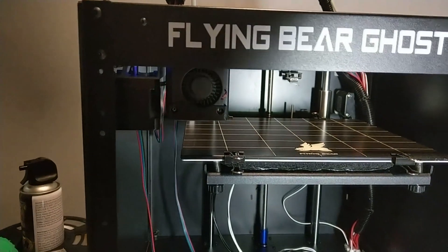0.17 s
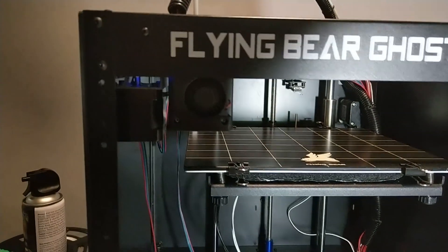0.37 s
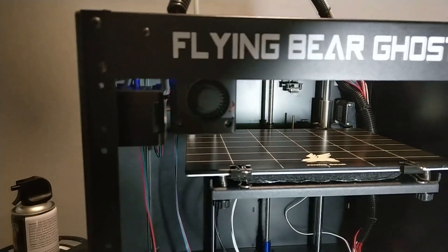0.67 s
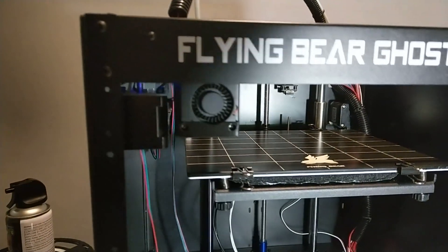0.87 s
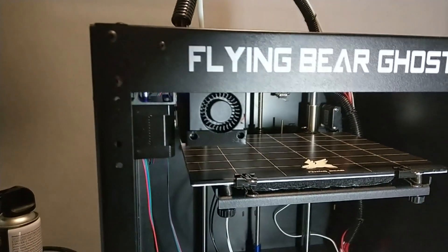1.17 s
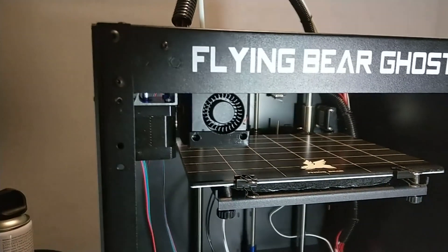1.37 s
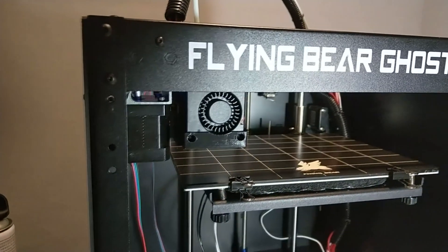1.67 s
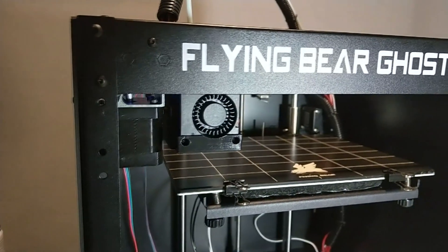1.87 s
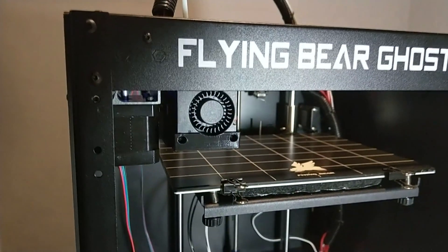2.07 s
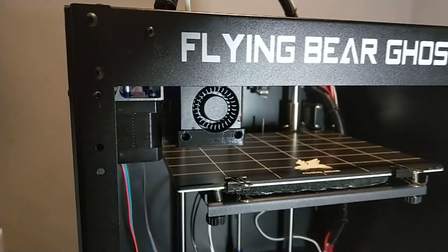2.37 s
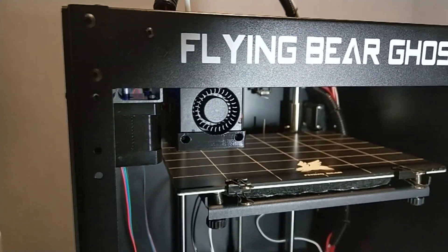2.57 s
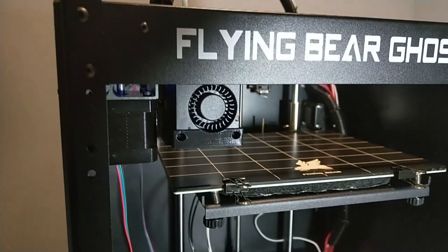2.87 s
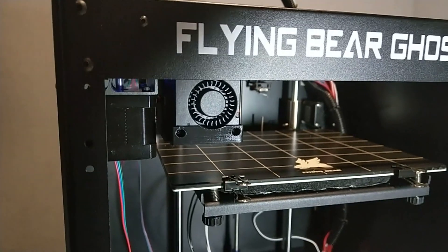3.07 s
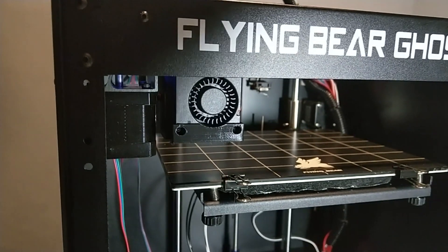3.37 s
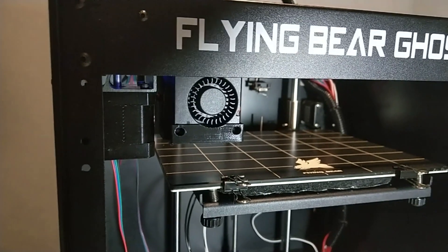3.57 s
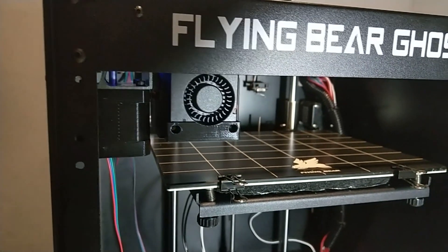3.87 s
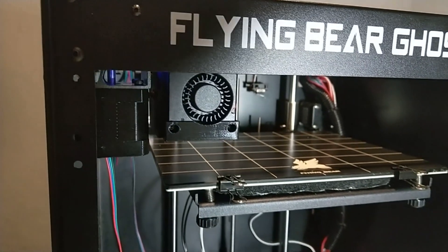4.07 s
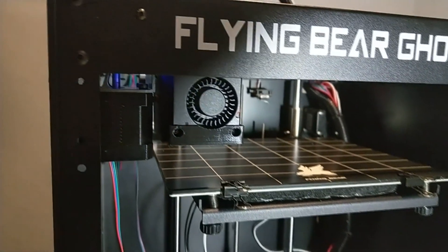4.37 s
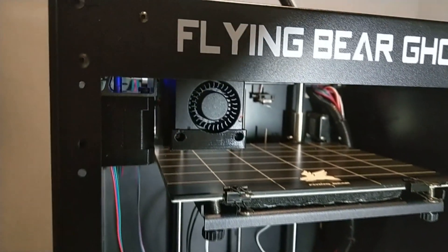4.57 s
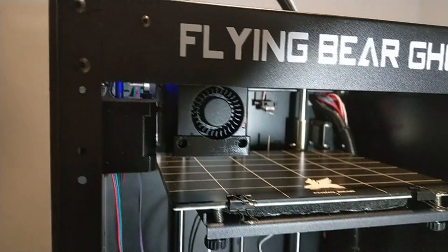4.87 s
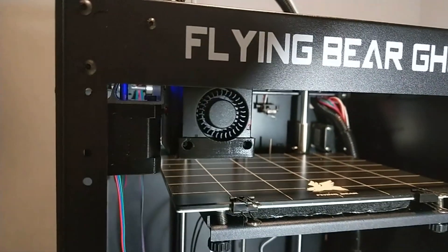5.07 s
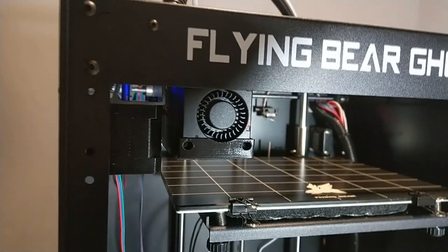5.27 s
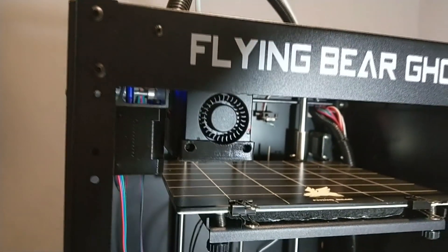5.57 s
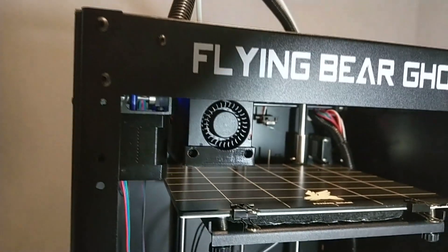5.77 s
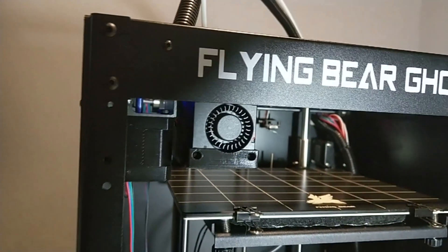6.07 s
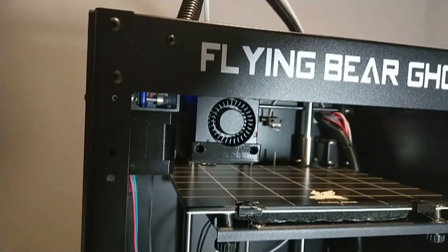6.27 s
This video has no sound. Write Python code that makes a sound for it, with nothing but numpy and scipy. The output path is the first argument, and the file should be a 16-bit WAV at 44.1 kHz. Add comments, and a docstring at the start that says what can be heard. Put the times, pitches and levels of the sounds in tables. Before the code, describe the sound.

A small cooling fan with a worn bearing runs in an open metal printer cabinet, close to a hand-held microphone. From the start it makes a shrill, buzzy whine with a metallic rattle, throbbing very quickly. At about 0.4 seconds the throb ends and the high whine carries on, wavering and roughening as the rubbing catches, slips and settles, with small scraping flutters around 0.7, 1.1 and 1.6 seconds. Near 2.4 seconds the rotor breaks free: the piercing whine stops and the fan speeds up slightly. A fine, steady rattle now rings the casing as a bright hiss over a quiet, gently rising hum, lasting until the end at about 6.4 seconds. A soft rush of air continues throughout. Faint low bumps and rubs from the hand come now and then, mostly between 3 and 4.3 seconds.

```python
"""A small blower with a worn bearing runs in an open metal cabinet, close to a hand-held phone.
At first the shaft knocks in step with each turn, making a whine that throbs as the rotor wobbles.
Air rushes throughout, and the hand bumps and rubs the phone. From 0.4 s the rubbing contact catches,
slips and settles. Near 2.4 s it breaks loose: the rotor speeds up, and its rattle rings the casing
as a hiss over a hum."""
import sys
import numpy as np
from scipy import signal
from scipy.fft import rfft, irfft
from scipy.io import wavfile
from scipy.ndimage import uniform_filter1d

SR = 44100
rng = np.random.default_rng(int(sys.argv[2]) if len(sys.argv) > 2 else 0)


def master(y):
    """Save y as 16-bit WAV."""
    cut = np.clip(np.atleast_2d(y).T, -1, 1)
    pcm = np.round(cut * 32767)  # scale
    wavfile.write(sys.argv[1], SR, pcm.astype(np.int16))


N = 282681
T = np.arange(N) / SR
F = np.maximum(np.fft.rfftfreq(N, 1 / SR), 1)

# How fast the shaft turns: (time [s], speed [turns per s])
SHAFT_SPEED = [(0, 157.65), (0.15, 156.66), (0.3, 157.42), (0.6, 158.05), (0.8, 158.43), (1.3, 158.86),
               (1.6, 158.96), (2, 158.8), (2.24, 158.7), (2.33, 158.6), (2.38, 157.7), (2.44, 160.2),
               (2.6, 164.5), (2.75, 166.79), (3, 169.18), (3.3, 171.03), (3.6, 170.93), (4.2, 174.02),
               (4.8, 175.2), (5.5, 175.75), (6.4, 176)]
# When the contact is caught, slipping, settled and finally free: (start [s], time to change over [s])
STAGE_CHANGES = [(.42, .04), (.6, .18), (1.04, .16), (2.372, .025)]
# The left microphone compared with the right:
# (frequency [Hz], level [dB], phase [rad], share reflected by the cabinet [0-1])
LEFT_MIC = [(59.3, 6, 0.5, 0.5), (196, -2, 0.42, 0.25), (544, -1.5, 0.23, 0.8), (880, -2.5, 1, 0),
            (1470, 0, 2, 0.7), (1970, -14, 1.5, 0.4), (2930, 0, 2, 0.61), (4410, -0.5, 2, 0.88),
            (5360, -9, 7.5, 1), (6860, -9.5, -1, 1), (7920, -20, 8.5, 1), (8610, -6, 7, 0),
            (9540, 9, 19.5, 0.14), (12200, -3.5, 0.5, 0.6)]


def undb(db):
    """Turn decibels into a gain."""
    return 10 ** (np.asarray(db) / 20)


def over_time(table):
    """Turn a time table into curves with one value per sample."""
    times, *columns = np.transpose(table)
    return [np.interp(T, times, column) for column in columns]


def over_hz(table):
    """Turn a frequency table into curves with one value per frequency in F."""
    hz, *columns = np.transpose(table)
    return [np.interp(np.log(F), np.log(hz), column) for column in columns]


def unit(x):
    """Scale a signal to an average (RMS) size of 1."""
    return x / np.sqrt(np.mean(x ** 2))


def wander(rate_hz, size=N):
    """A smooth random curve of average size 1 that heads somewhere new rate_hz times a second."""
    hold = int(SR / rate_hz)
    steps = np.repeat(rng.standard_normal(size // hold + 1), hold)
    return unit(uniform_filter1d(uniform_filter1d(steps, hold), hold)[:size])


def bump(middle_s, half_s):
    """A smooth rise and fall that reaches 1 in the middle."""
    return np.cos(np.pi / 2 * np.clip((T - middle_s) / half_s, -1, 1)) ** 2


def resonance(hz, width_hz, db):
    """A steep filter for something that rings near one pitch."""
    return undb(db) / (1 + 1j * (F / hz - hz / F) * hz / width_hz) ** 2


def sustained(spectrum, evenness=0.4):
    """A ringing that keeps itself going, as a complex signal with its dips partly filled in."""
    ringing = signal.hilbert(irfft(spectrum, N))
    return ringing * (np.std(ringing) / np.abs(ringing)) ** evenness


def contact_stages():
    """The share of each stage over time: throbbing, caught, slipping, settled, free."""
    changes = [np.clip((T - start) / takes, 0, 1) for start, takes in STAGE_CHANGES]
    reached = np.array([np.ones(N), *changes, np.zeros(N)])
    return reached[:-1] - reached[1:]


def knocking(turns, wobble, throb, low_throb, stages, loose):
    """Knocks on every turn blend into a whine of harmonics: tones at multiples of the shaft speed."""
    # The whine's tones; the wobble adds a side tone below and above each: (harmonic [number],
    # throbbing [dB], caught [dB], slipping [dB], settled [dB], lower side [dB], upper side [dB])
    harmonics = [(1, -59, -61, -63, -64, -15, -19), (2, -74, -87, -84, -85, -7, -7),
                 (3, -66, -66, -64, -64, -26, -23), (5, -78, -74, -70, -68, -16, -19),
                 (7, -77, -73, -73, -74, -14, -7), (9, -70, -68, -70, -74, -13, -14),
                 (11, -77, -70, -76, -69, -12, -10), (12, -65, -72, -71, -65, -2, -1),
                 (13, -57, -56, -60, -61, -11, -16), (14, -65, -68, -70, -66, -4, -1),
                 (15, -62, -62, -61, -65, -8, -7), (17, -69, -67, -70, -69, -13, -11),
                 (20, -63, -56, -60, -67, -15, -17), (21, -74, -71, -69, -72, -10, -10),
                 (24, -72, -70, -71, -66, -14, -18), (25, -66, -68, -74, -69, -7, -14),
                 (26, -71, -67, -69, -70, -9, -10), (27, -64, -58, -59, -61, -12, -4),
                 (28, -62, -59, -66, -65, -7, -12), (30, -77, -75, -74, -70, -6, -6),
                 (31, -62, -59, -62, -55, -6, -6), (32, -79, -65, -64, -65, -7, -4),
                 (33, -68, -54, -55.5, -57, 0, 0), (34, -75, -67, -63, -60, -7, -6),
                 (35, -62, -60, -53, -57, -4, -5), (36, -74, -68, -65, -57, -8, -10),
                 (37, -59, -59, -58, -48, -6, -9), (38, -72, -60, -62, -59, -5, -5),
                 (39, -73, -65, -54, -58, -10, -6), (40, -70, -68, -66, -65, -8, -3),
                 (41, -62, -48, -52, -52, -2, -2), (42, -58, -60, -55, -56, -7, -1),
                 (43, -57, -52, -48, -45, -8, 0), (44, -48.5, -51, -47, -53, -9, -5),
                 (45, -36, -35.5, -41, -39.5, 2, -3), (46, -61, -43, -48, -50, -4, -4),
                 (47, -57, -45, -55, -40.5, -5, -1), (48, -61, -54, -56, -66, -2, -4),
                 (49, -56, -43, -38, -43, -3, -3), (50, -52, -50, -52, -53, -3, -8),
                 (51, -65, -60, -52, -49, -2, -5), (52, -70, -58, -56, -62, -7, -5),
                 (53, -58, -82, -64, -62, -4, -7), (54, -70, -65, -64, -70, -5, -5),
                 (55, -70, -72, -62, -59, -5, -1), (89, -92, -85, -77, -77, 6, 3)]
    # How strongly the wobble rocks the tones: (time [s], side tone strength [factor])
    wobble_strength = [(.45, .4), (.58, .45), (.68, .9), (.82, .6), (.98, .5), (1.1, 1), (1.2, 1),
                       (1.25, .5), (1.31, .5), (1.37, 1.15), (1.85, 1), (1.97, .5), (2.23, .45),
                       (2.33, 1.1)]
    # Tones the left microphone hears in their own way, compared with the right: (harmonic [number],
    # level before settling [dB], level after [dB], phase before [rad], phase after [rad])
    left_tones = [(1, -1, 0, -0.4, -0.3), (3, -2, -3, 0.5, 0.5), (5, 1, -3, -0.5, -0.4),
                  (9, -2, 4, 2.3, 1.4), (13, -7, -7, 0.8, 0.6), (15, -15, -7, -3.0, -2.6),
                  (20, -13, -4, 2.8, 0.7), (24, 2, -7, 0.9, 2.5), (27, -4, -12, 1.6, 2.9),
                  (28, -3, -4, 3.0, 2.3), (31, 2, -10, -0.4, 3.1), (33, -2, -2, -1.2, -0.9),
                  (34, -6, -11, 0.9, 2.5), (35, -8, -6, -2.3, -1.8), (36, -6, -8, 1.4, 0.6),
                  (37, -4, -12, 2.4, 1.7), (39, -7, -7, -1.5, 0.6), (41, -10, -9, 3.0, 0.5),
                  (42, -5, -3, 0.3, -0.5), (43, -3, -11, 2.8, -1.2), (44, -15, -12, 2.7, -2.4),
                  (45, -13, -10, 2.0, -2.6), (46, -17, -13, 0.6, -2.8), (47, -13, -20, -2.8, -1.6),
                  (49, -22, -23, 2.2, 2.5), (50, -12, -8, -1.3, -0.6), (51, -11, -11, 2.7, 2.7)]
    left_by_order = {order: rest for order, *rest in left_tones}
    mic_hz, mic_db, mic_rad, _ = np.transpose(LEFT_MIC)
    first_high_order, waver_db = 42, 1.5
    n = int(sum(STAGE_CHANGES[-1]) * SR)  # the knocking ends once the rotor is free
    throbbing, caught, slipping, settled, free = stages[:, :n]
    settled = settled + free
    roughness = 0.045 + loose[:n]
    angle = 2 * np.pi * turns[:n] + 0.001 * wander(30, n)  # bearing play blurs the high tones most
    sway = (1 - throbbing) * over_time(wobble_strength)[0][:n]
    rock = np.exp(1j * (wobble[:n] + 0.5 * settled * wander(7.34, n)))
    slip_dip = 1.2 * caught * slipping  # up to 30 % quieter half-way from caught to slipping
    out = np.zeros((2, N))
    for order, *stage_db, below_db, above_db in harmonics:
        # Odd harmonics keep step, giving two knocks a turn.
        start_rad = 0.16 * order ** 2 if order % 2 else rng.uniform(0, 2 * np.pi)
        reach = min(order / 45, 1)  # dip, throb and flutter affect the high tones most
        gain = sum(share[:n] * undb(db) for share, db in zip(stages, stage_db))
        waver = 1 + (undb(waver_db) - 1) * (8 < order < first_high_order) * wander(4.88, n)
        pulse = (low_throb if order < first_high_order else throb)[:n] ** (min(3 * reach, 1) ** 2)
        gain = gain * (1 - reach * slip_dip) * waver * pulse
        flutter = roughness * reach ** 2 * (wander(53.56, n) + 1j * wander(54.9, n))
        below, above = undb(below_db), undb(above_db)
        shape = 1 + 1j * sway * (below / rock + above * rock) + flutter  # all rock in pitch together
        shape /= np.sqrt(1 + sway ** 2 * (below ** 2 + above ** 2))
        tone = np.sqrt(2) * gain * shape * np.exp(1j * (order * angle + start_rad))

        hz = order * SHAFT_SPEED[0][1]
        left_db, left_rad = np.interp(hz, mic_hz, mic_db), np.interp(hz, mic_hz, mic_rad)
        usual = (left_db, left_db, left_rad, left_rad)
        early_db, late_db, early_rad, late_rad = left_by_order.get(order, usual)
        left = (1 - settled) * undb(early_db) * np.exp(1j * early_rad)
        left += settled * undb(late_db) * np.exp(1j * late_rad)
        out[:, :n] += np.real([tone * left, tone])
    return out


def rattle(turns, throb, stages, loose):
    """Many tiny uneven hits, bunched by the turning shaft, make the metal casing ring."""
    # The free rotor's rattle: (time [s], overall level [dB], low resonance gain [dB],
    # its pitch [Hz], metallic ring gain [dB], share of the free-running sound [0-1])
    free_rattle = [(2.43, -39.5, 0, 1950, -5.5, 1), (2.9, -39, 2.5, 1930, 0, 0.94),
                   (3.1, -39, -0.5, 1942, -3.5, 0.99), (3.3, -39, 2.5, 1955, -1.5, 0.94),
                   (3.55, -39.5, 8, 1978, 3, 0.9), (3.7, -38.5, -5, 1934, -3, 0.99),
                   (3.82, -38.5, 1.5, 1915, -2, 0.99), (3.9, -38, -0.5, 1930, -0.5, 1),
                   (4.25, -38, 0, 1961, -0.5, 1), (4.7, -37.5, 1.5, 1928, -1.5, 1),
                   (5.55, -38.5, 1.5, 1939, 2, 1), (5.85, -39, 2, 1939, -1, 0.98),
                   (6.4, -38, 1.5, 1946, -6, 1)]
    # Where the casing rings: (pitch [Hz], width [Hz], contact held [dB], throbbing [dB], rotor free [dB])
    casing_resonances = [(592, 200, -10, -14.5, -25), (1095, 780, -12.5, -16.5, -26.5),
                         (2200, 182, 0, -16.5, -14.5), (2324, 120, -9, -3, -18),
                         (2682, 70, -32, -16, -17.5), (3213, 234, -4, -19, -17.5),
                         (3583, 220, -1.5, -7, -18), (3936, 460, -14, -14.5, -19),
                         (4516, 510, -3, -5.5, -15.5), (5524, 150, -13, -16, -7.5),
                         (5843, 330, -13, -1, -6.5), (6564, 170, -4, 7, -3.5), (7063, 265, 16.5, 13.5, 0.5),
                         (7540, 310, 16, 15, -3.5), (7721, 330, 3, 15, -2), (8315, 220, 9, 2, -7.5),
                         (8785, 154, 12, -2, -8), (9550, 280, -10.5, -19, -32.5),
                         (10140, 260, -38, -41, -32)]
    free_db, free_low_db, low_hz, ring_db, running = over_time(free_rattle)
    throbbing, free = stages[0], stages[-1]
    held = 1 - throbbing - free
    running = np.clip(running * free, 0, 1)
    bunching = 1 + 0.19 * np.cos(2 * np.pi * turns * 5 / 3) + 0.15 * np.cos(2 * np.pi * turns * 4 / 3)
    hits = rfft(rng.standard_normal(N) * bunching * undb(0.22 * wander(300) + 0.19 * wander(12)))

    filters = [sum(resonance(hz, width, db[k]) for hz, width, *db in casing_resonances) for k in range(3)]
    holding, throbbing_rattle, free_running = (irfft(hits * response, N) for response in filters)
    dull = irfft(rfft(throbbing_rattle) * (0.5 + 0.5 / (1 + (F / 7400) ** 20)), N)  # halved above 7400 Hz
    casing = throbbing * dull + held * holding + (free - running) * throbbing_rattle
    casing += running * free_running

    unshifted_hz = 2200
    shift = np.exp(2j * np.pi * np.cumsum(low_hz - unshifted_hz) / SR)  # moves the pitch to low_hz
    low = np.real(sustained(hits * resonance(unshifted_hz, width_hz=117, db=-5.5)) * shift)
    low *= undb(-22 * throbbing - 11 * held * loose + free * free_low_db)

    close_pair = resonance(5215, width_hz=90, db=-6) - resonance(5300, width_hz=90, db=-6)
    ring = sustained(hits * close_pair).real
    ring *= free * undb(ring_db) + throbbing * undb(5) + held * loose * undb(12)

    level_db = -51 * throbbing + held * (-62.5 + 22 * loose) + free * free_db
    return (casing + low + ring) / np.sqrt(np.mean(free_running ** 2)) * undb(level_db) * np.sqrt(throb)


def sizzle(free, fade_db_per_s=2.5):
    """The rubbing contact gives a thin, high hiss that fades slowly and stops when it breaks free."""
    hiss = unit(irfft(rfft(rng.standard_normal(N)) * resonance(11000, width_hz=9000, db=0), N))
    return hiss * undb(-65 - fade_db_per_s * T + wander(8.6)) * (1 - free)


def airflow():
    """Moving air and the room make a steady, wide hush."""
    # The tone colour of the hush: (frequency [Hz], level [dB])
    hush_levels = [(40, -97), (100, -95), (250, -103), (600, -102), (1200, -104), (1950, -89.5),
                   (2600, -101), (4300, -102), (7600, -77.5), (9600, -108), (11500, -113), (13000, -114),
                   (14300, -110), (15200, -114)]
    common, separate = rng.standard_normal(N), rng.standard_normal((2, N))
    spectrum = rfft(common) + rfft(separate) / (1 + (F / 10500) ** 4)
    mic_gains = np.array([undb(over_hz(LEFT_MIC)[0]), np.ones(len(F))])
    return irfft(spectrum * undb(over_hz(hush_levels)[0]) * mic_gains, N) * np.sqrt(SR / 2)


def hand_on_phone(thump_hz=21.6, rise_s=0.028, resting_db=-74):
    """The holding hand sends soft thumps and a low rumble through the phone's body."""
    # The hand shifts: (time [s], level [dB], time to fade by 60 dB [s])
    thumps = [(0.238, -54, 0.49), (2.298, -55, 0.35), (3.059, -52, 0.41), (3.684, -47, 0.97),
              (4.239, -50, 0.41)]
    # The hand rubs: (middle [s], level [dB], half length [s])
    rubs = [(0.01, -79, 0.55), (1.16, -59, 0.18), (1.71, -69.5, 0.17), (2.534, -72, 0.14),
            (2.996, -66.5, 0.3), (3.504, -65, 0.21), (3.738, -69, 0.17), (3.96, -71, 0.12),
            (4.235, -60, 0.16), (4.63, -73, 0.14), (5.184, -66, 0.057)]
    out = np.zeros((2, N))
    for start, db, fade_s in thumps:
        age = np.maximum(T - start, 0)
        envelope = np.minimum(age / rise_s, 1) * undb(db - 60 * age / fade_s)
        out += envelope * np.sin(2 * np.pi * thump_hz * age)
    common, separate = rng.standard_normal(N), rng.standard_normal((2, N))
    body = resonance(68, 31, -5) + resonance(117.5, 38, 0) + resonance(212, 99, -12)
    rumble = unit(irfft(rfft(common + 0.36 * separate) * body, N))
    rubbing = sum(undb(db) * bump(middle, half) for middle, db, half in rubs)
    return out + rumble * (undb(resting_db) + rubbing)


def free_rotor_hum(turns, speed, free, full_speed_hz=175):
    """The freed rotor hums at multiples of a third of its speed and whirls with two wavering tones."""
    # The tones of the hum: (pitch [thirds of the shaft speed], base level [dB])
    hum_tones = [(2, -78.5), (3, -61), (12, -73.5), (13, -73.5), (15, -66), (18, -62), (26, -63),
                 (33, -47.5), (36, -56), (45, -61.5)]
    # The swell of the higher tones, which come from the blades: (time [s], gain [dB])
    blade_swell = [(2.8, -17), (3.2, -11.5), (4.4, -10.5), (5.33, -4.5), (5.45, -4.5), (5.95, -4),
                   (6.1, -7.5)]
    # The loose rotor's two whirl tones, each: (time [s], pitch [Hz], level [dB])
    low_whirl = [(2.45, 425, -74), (2.8, 418, -66.5), (3.45, 425, -68.5), (3.7, 403, -77),
                 (4.4, 410.6, -72.5), (5.9, 413, -67), (6.4, 411, -70.5)]
    high_whirl = [(2.4, 468.5, -62), (2.5, 448, -74), (2.95, 467, -69), (3.55, 469, -67.5),
                  (3.73, 457, -72), (4.4, 465.5, -68), (6.4, 470, -73.5)]
    angle = 2 * np.pi * turns / 3 + 0.018 * wander(25)
    low_db = 0.61 * (speed - full_speed_hz)  # the low tones grow as the rotor speeds up
    blade_db = over_time(blade_swell)[0]
    out = np.zeros(N)
    for thirds, db in hum_tones:
        level_db = db + (low_db if thirds < 18 else blade_db) + min(thirds / 8, 1) * wander(16)
        out += undb(level_db) * np.cos(thirds * angle + rng.uniform(0, 2 * np.pi))
    for whirl in (low_whirl, high_whirl):
        hz, db = over_time(whirl)
        gain = undb(db + 1.45 * wander(8))
        out += gain * np.cos(2 * np.pi * np.cumsum(hz + 2.38 * wander(20)) / SR)
    return np.sqrt(2) * out * free


def microphones(noise, tones, echo_s=0.3):
    """The sheltered left microphone hears tones directly, but much of the noise off the cabinet walls."""
    db, phase, reflected = over_hz(LEFT_MIC)
    direct = np.exp(1j * phase)
    echo = rfft(rng.standard_normal(N) * undb(-60 * T / echo_s))
    both_paths = np.sqrt(1 - reflected ** 2) * direct + reflected * echo / np.abs(echo)
    left = irfft(undb(db) * (rfft(noise) * both_paths + rfft(tones) * direct), N)
    return np.array([left, noise + tones])


def scene():
    """Work out how the rotor moves, then add up all the sounds in stereo."""
    # How fast the rotor wobbles: (time [s], rate [Hz])
    wobble_rate = [(0, 25.0), (.3, 25.1), (.41, 25.5), (.46, 29), (.9, 31.5), (1.4, 32), (1.7, 29.5),
                   (1.95, 25.5), (2.4, 26)]
    # Shakes that briefly loosen the contact: (middle [s], half length [s], added flutter [0-1])
    shakes = [(.7, .13, .3), (1.13, .11, .36), (1.61, .31, .2), (1.87, .05, .15), (2.39, .1, .2)]
    swing_hz, calming_s, calm_s = 2.1, 0.35, 0.46  # the swing in shaft speed, and when it dies away
    lag_rad, low_lead_rad = 0.6, 2.7  # loudest just after the slowest moment; low tones throb earlier
    wobble = 2 * np.pi * (np.cumsum(over_time(wobble_rate)[0]) / SR + 0.46)
    rocking = np.clip((calm_s - T) / (calm_s - calming_s), 0, 1)
    freed_s = STAGE_CHANGES[-1][0]
    depth = 0.5 * rocking + 0.15 * bump(freed_s + 0.3, 0.3)  # the throb returns briefly once free
    throb = 1 - depth * np.cos(wobble - lag_rad)
    low_throb = 1 - depth * np.cos(wobble - lag_rad + low_lead_rad)
    speed = over_time(SHAFT_SPEED)[0]
    turns = np.cumsum(speed + swing_hz * rocking * np.cos(wobble)) / SR
    loose = sum(added * bump(middle, half) for middle, half, added in shakes)
    stages = contact_stages()
    free = stages[-1]

    noise = rattle(turns, throb, stages, loose) + sizzle(free)
    whine = knocking(turns, wobble, throb, low_throb, stages, loose)
    hum = free_rotor_hum(turns, speed, free)
    return whine + microphones(noise, hum) + airflow() + hand_on_phone()


def record(dry, cutoff_hz=15150):
    """The phone cuts off the highest treble."""
    return signal.sosfilt(signal.ellip(10, 0.2, 80, cutoff_hz, fs=SR, output="sos"), dry)


dry = scene()
out = record(dry)
master(out)
```